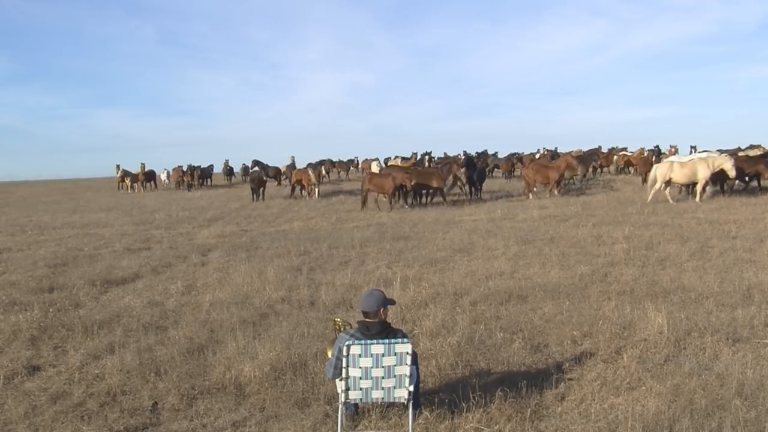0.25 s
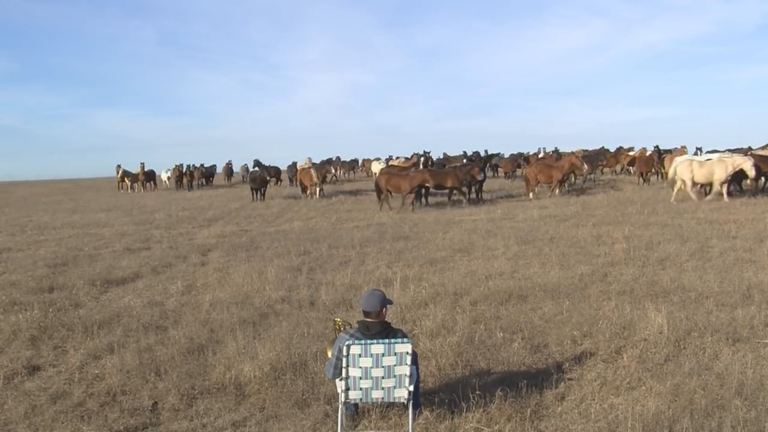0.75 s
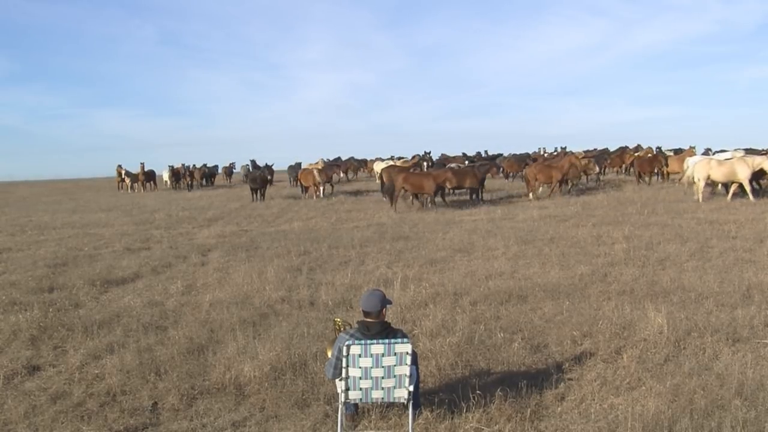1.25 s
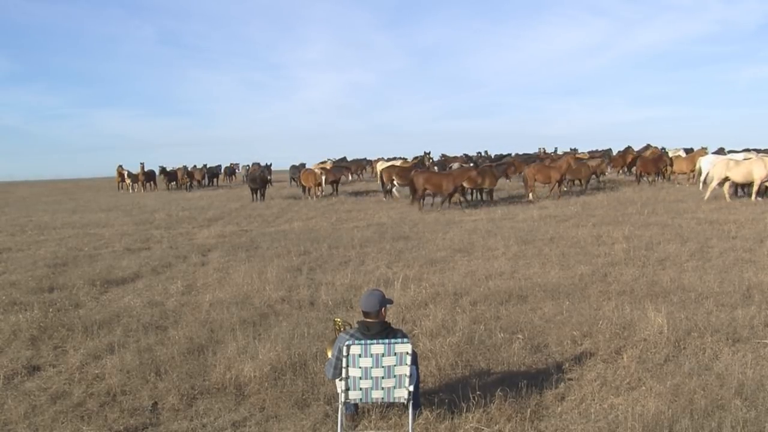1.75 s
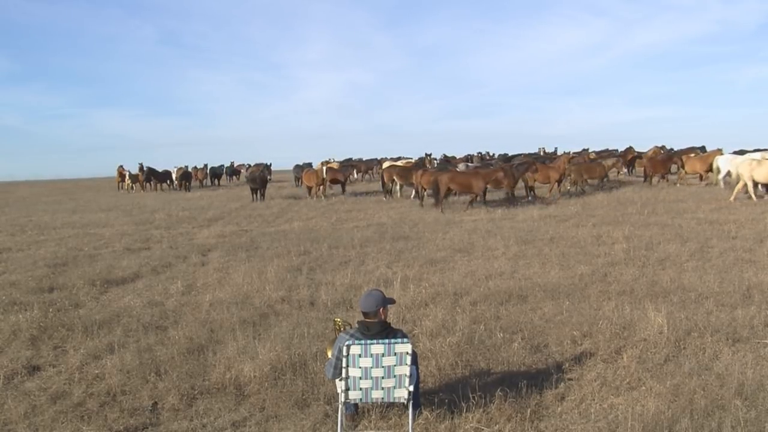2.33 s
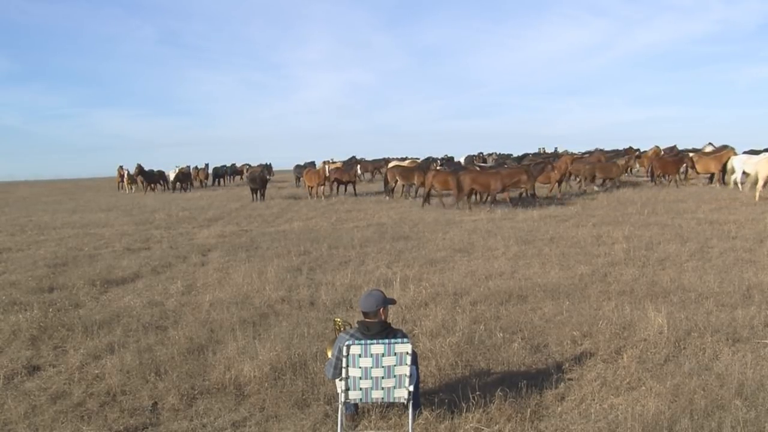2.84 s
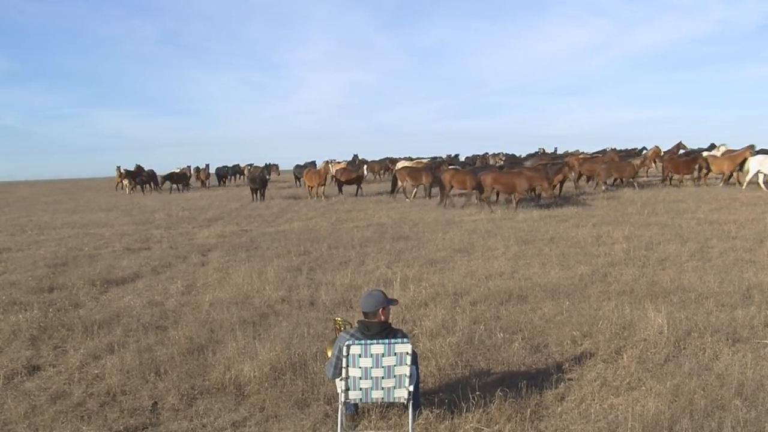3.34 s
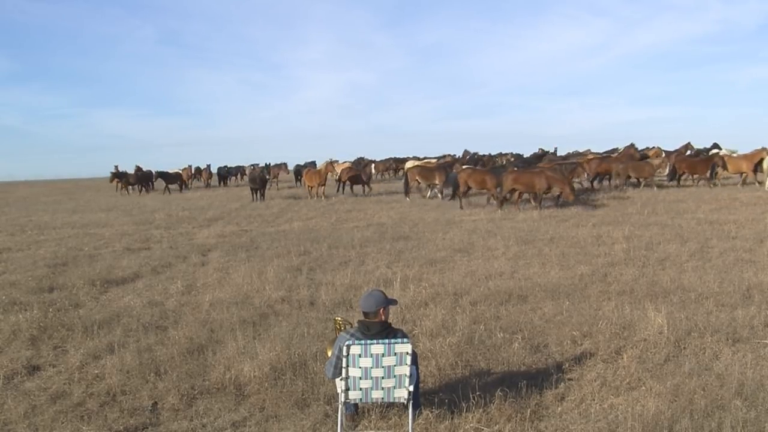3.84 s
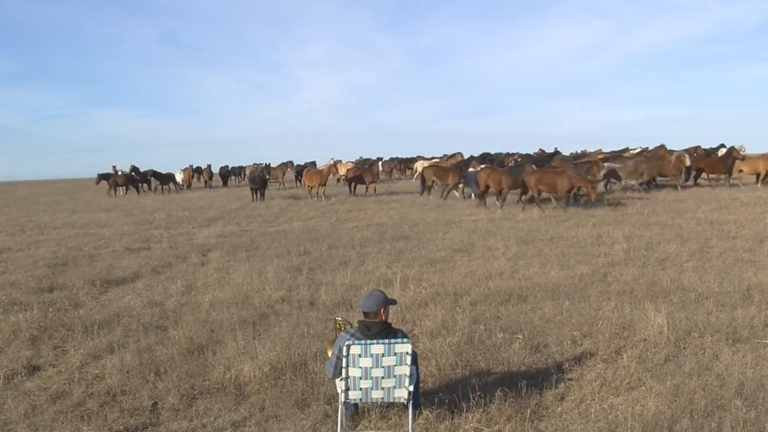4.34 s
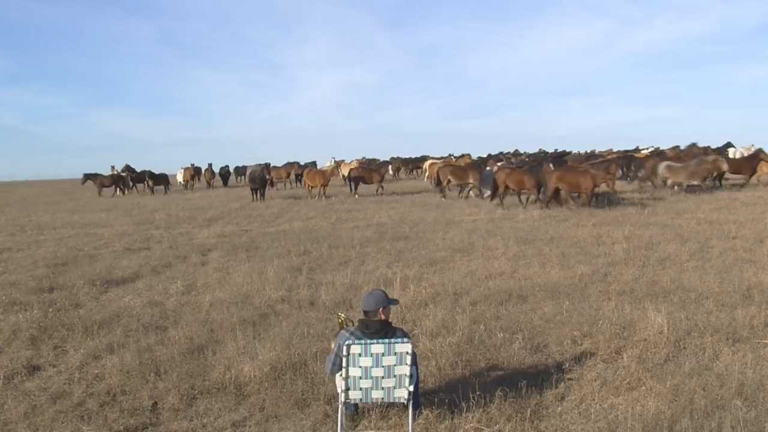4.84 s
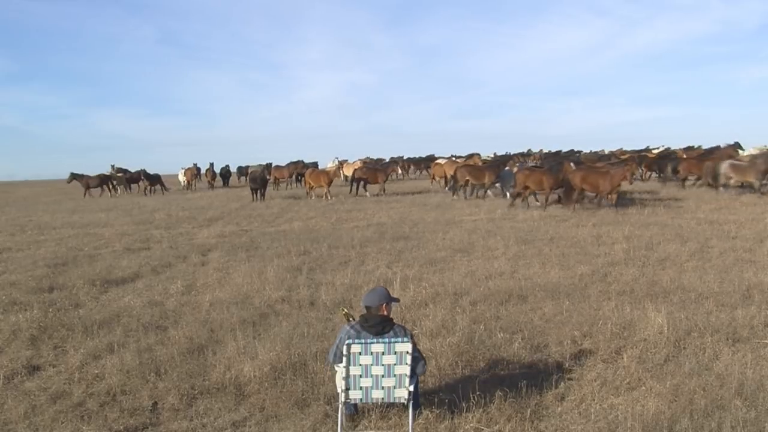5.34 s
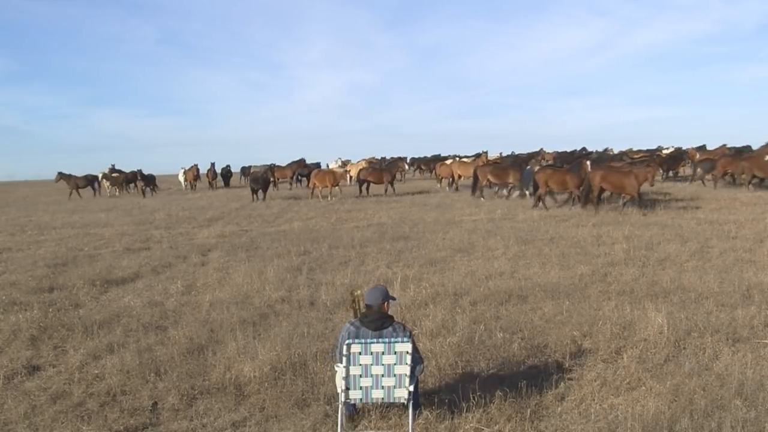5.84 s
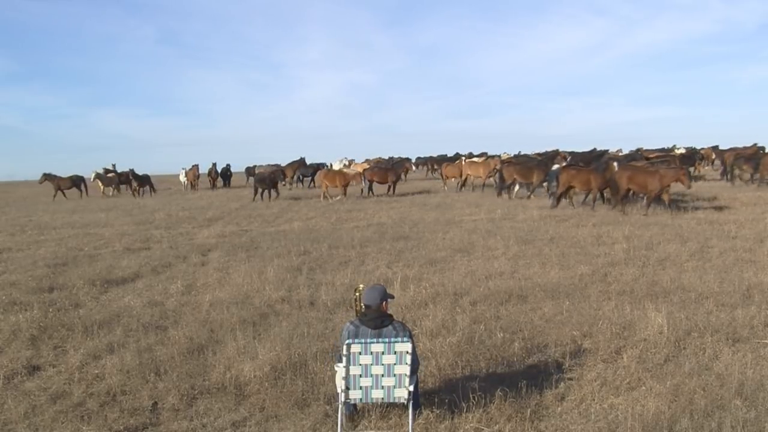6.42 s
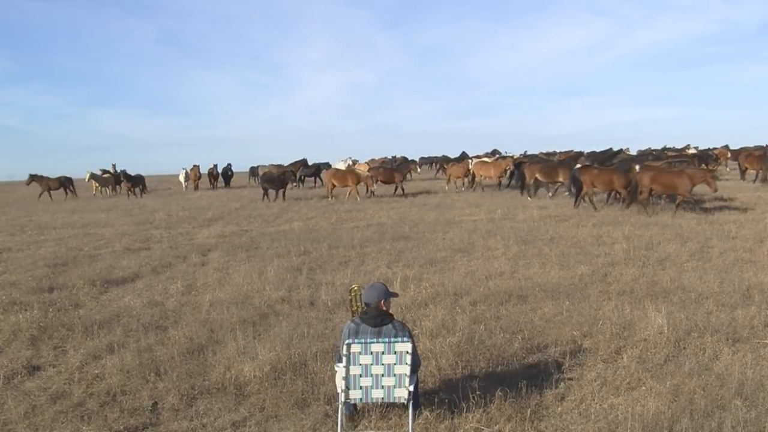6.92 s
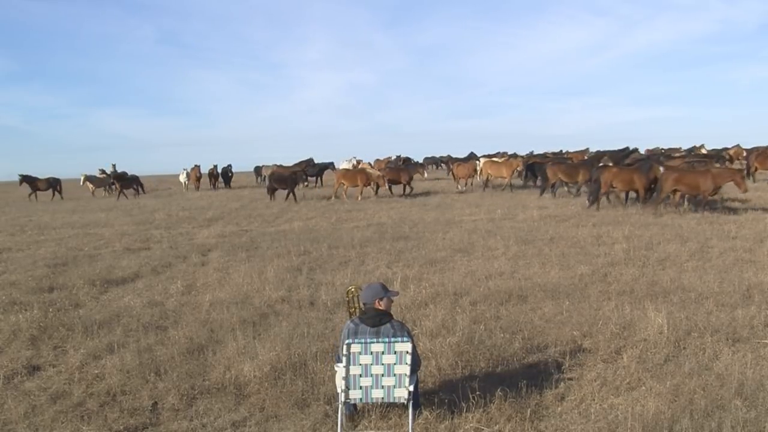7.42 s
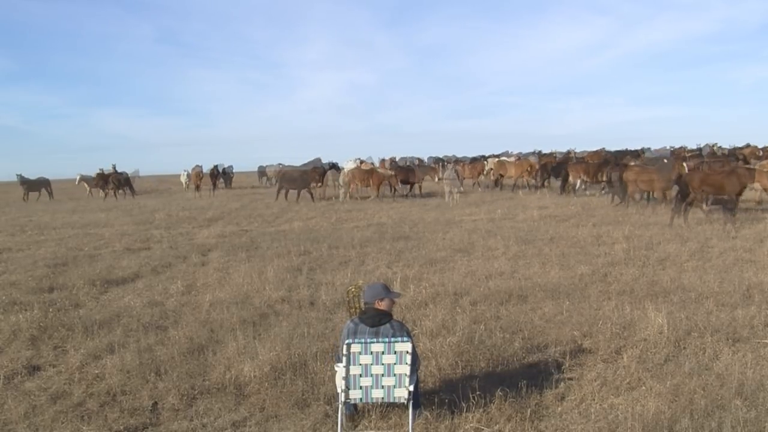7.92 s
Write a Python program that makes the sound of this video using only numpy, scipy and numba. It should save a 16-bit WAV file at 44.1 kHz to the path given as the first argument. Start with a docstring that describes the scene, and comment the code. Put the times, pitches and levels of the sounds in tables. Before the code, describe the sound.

A herd walks quietly through dry grass in a breeze, with thin far whinnies and one loud, fluttering snort close by.

```python
"""Horses in dry grass

A herd walks over an open plain: legs brush the stalks, hooves thud softly, and a breeze buffets the
microphone now and then. Thin, quavering whinnies come from far off, each a high whistle over a lower
voice. A near horse snorts loudly, its nostrils popping, rasping and squealing as they flutter in the
rush of air, and another follows faintly."""
import sys
import numpy as np
from scipy import signal
from scipy.fft import rfft, irfft, next_fast_len
from scipy.io import wavfile
from scipy.ndimage import uniform_filter1d, map_coordinates
from numba import njit

SR = 44100
rng = np.random.default_rng(int(sys.argv[2]) if len(sys.argv) > 2 else 0)


def pcm_store(signal):
    """Save signal as 16-bit PCM."""
    levels = np.round(np.clip(np.atleast_2d(signal), -1, 1) * 32767)
    wavfile.write(sys.argv[1], SR, levels.astype(np.int16).T)


N = 360297
TIME = np.arange(N) / SR


def undb(db):
    """Decibels to gain."""
    return 10 ** (np.asarray(db) / 20)


def unit(x):
    """Scale to rms 1."""
    return x / np.sqrt(np.mean(x ** 2))


def noise():
    """White noise."""
    return rng.standard_normal(N)


def walk(rate_hz):
    """Smooth random modulation, rms 1."""
    t = TIME[::8]
    smooth = map_coordinates(rng.standard_normal(len(t)), [t * rate_hz], order=2, mode="wrap")
    return unit(np.interp(TIME, t, smooth))


def curves(table):
    """An automation curve for each column after the time."""
    times, *columns = np.transpose(table)
    return [np.interp(TIME, times, column) for column in columns]


def during(table):
    """A soft-edged gate, open from a table's first time to its last."""
    return uniform_filter1d(1. * ((TIME > table[0][0]) & (TIME < table[-1][0])), size=300)


def bursts(table):
    """Envelope of rounded swells."""
    return np.sqrt(sum(undb(2 * db) * np.exp(-np.minimum(np.abs(2 * (TIME - s) / length) ** 3, 50))
                       for s, length, db in table))


def colour(x, spectrum):
    """Minimum-phase EQ of unit power: the spectrum sets only the tone."""
    hz, db = np.transpose(spectrum)
    grid = np.maximum(np.fft.rfftfreq(4096, 1 / SR), 1)
    cepstrum = irfft(np.log(undb(np.interp(np.log(grid), np.log(hz), db))))
    half = len(cepstrum) // 2
    response = irfft(np.exp(rfft(np.r_[cepstrum[0], 2 * cepstrum[1:half], np.zeros(half)])))
    return signal.fftconvolve(x, response / np.linalg.norm(response))[:N]


@njit
def resonate(x, hz, q):
    """Band-pass with a moving centre."""
    y, band, low = np.empty(len(x)), 0., 0.
    for i in range(len(x)):
        g = np.tan(np.pi * hz[i] / SR)
        v = (band + g * (x[i] - low)) / (1 + g * (g + 1 / q))
        band, low, y[i] = 2 * v - band, low + 2 * g * v, v / q
    return y


def singing_band(hz, q, steadiness):
    """Air ringing in a resonance: steadiness 0 is ringing noise, 1 an even tone."""
    band = resonate(resonate(noise(), hz, q), hz, q)
    strength = np.sqrt(np.abs(uniform_filter1d(band ** 2, size=90)) + 1e-12)
    return unit(band / strength ** steadiness)


def scatter(x, decay_s):
    """A short diffuse tail, as from grass and bodies."""
    t = TIME[:SR // 2]
    tail = rng.standard_normal(len(t)) * np.exp(-t / decay_s)
    return signal.fftconvolve(x, tail / np.linalg.norm(tail))[:N]


def crunches(steps_per_s=9, attack_s=.0047, decay_s=.023):
    """Envelope of hooves crushing dry grass at random moments."""
    steps = (rng.random(N) < steps_per_s / SR) * undb(3 * np.tanh(noise()))
    t = TIME[:SR // 4]
    return signal.fftconvolve(steps, np.exp(-t / decay_s) * np.minimum(t / attack_s, 1))[:N]


# Tone of brushed grass and of brittle stalks: freq_hz, gain_db
GRASS_EQ = [(30, -63), (90, -46), (160, -35.5), (350, -26.5), (650, -12.5), (1000, -9.5), (1350, -2.5),
            (1700, 2), (2500, -6.5), (4200, -14.5), (6200, -22), (10000, -27.5), (15500, -30)]
STALK_EQ = [(60, -70), (500, -31), (1300, -14.5), (2000, 8.5), (4000, -1.5), (6200, -8.5), (8500, -8.5),
            (15000, -23)]
# Legs sweeping through nearer stalks: centre_s, length_s, level_db
SWISHES = [(.27, 0.074, -71), (2.043, 0.016, -59), (2.11, 0.18, -66.5), (3.1, 0.065, -62.5),
           (3.41, 0.18, -62), (5.35, 0.11, -70), (5.8, 0.13, -63.5), (5.99, 0.11, -65), (6.31, 0.11, -66),
           (7.77, 0.09, -64)]


def grass(level_db):
    """Legs brush and crush dry stalks into a grainy rustle."""
    grains = np.minimum(rng.exponential(size=(2, N)), 5)
    brush = colour(unit(noise() * undb(2.5 * grains[0])), GRASS_EQ) * undb(level_db + .43 * walk(19))
    crunch = colour(unit(noise() * undb(4 * grains[1])), GRASS_EQ) * crunches() * undb(level_db - 2.5)
    crackle = colour(unit(noise() * undb(3.1 * grains[1])), STALK_EQ)
    crackle *= undb(level_db - 13 + 4.8 * np.tanh(walk(9))) + bursts(SWISHES)
    return brush + crunch + crackle


# Nearer hoof falls: start_s, level_db
HOOF_FALLS = [(2.766, -59), (2.87, -76), (6.096, -64), (6.453, -67), (6.84, -70), (6.908, -62.5),
              (7.161, -69), (7.32, -69)]
# Dull tone of turf: freq_hz, gain_db
THUD_EQ = [(30, -48), (90, -13.5), (160, 6), (350, 2.5), (700, -6.5), (1500, -12), (5000, -30)]


def hooves(swell_db, tread_db=-82, decay_s=.014):
    """Single hooves land on turf over the soft tread of the herd."""
    falls = sum(undb(db) * (TIME > s) * np.exp(-np.abs(TIME - s) / decay_s) for s, db in HOOF_FALLS)
    tread = undb(tread_db + swell_db + 7.8 * np.tanh(walk(12)))
    return colour(noise() * (falls + tread), THUD_EQ)


def herd(rustle_db=-56.5, pass_db=3.5, pass_at_s=4.97, pass_width_s=1.56):
    """Rustle and tread swell as the nearest horses go by."""
    swell_db = pass_db * np.exp(-((TIME - pass_at_s) / pass_width_s) ** 2) - .17 * walk(1.38)
    return grass(rustle_db + swell_db) + hooves(swell_db)


# Breaths of wind, and the hardest eddies in them: centre_s, length_s, level_db
GUSTS = [(0, 0.15, -58.5), (.36, 0.44, -63), (.75, 0.31, -52.5), (1.12, 0.36, -58), (1.47, 0.076, -58),
         (1.9, 0.37, -64.5), (2.23, 0.076, -65.5), (2.3, 0.98, -80.5), (2.62, 0.14, -59.5),
         (2.9, 0.16, -69), (7.85, 0.35, -64.5)]
EDDIES = [(0.216, 0.014, -54.5), (0.694, 0.0052, -43.5), (.708, 0.01, -41), (.776, 0.013, -44.5),
          (0.844, 0.0091, -47), (0.953, 0.043, -52), (1.014, 0.0029, -42), (1.023, 0.016, -51),
          (1.041, 0.0039, -43.5), (1.101, 0.016, -41), (1.126, 0.03, -46), (1.282, 0.021, -51.5),
          (1.781, 0.052, -47), (1.919, 0.01, -52), (2.005, 0.0049, -42.5), (2.022, 0.019, -43.5),
          (2.236, 0.015, -51.5), (2.364, 0.014, -65), (2.546, 0.013, -48.5), (2.604, 0.059, -52.5),
          (2.67, 0.036, -50), (7.878, 0.085, -48.5), (8.01, 0.042, -43.5), (8.053, 0.049, -43)]
# Tone of the four wind layers: freq_hz, gain_db
BREEZE_EQ = [(25, -20), (65, -10), (130, 2), (200, 9.5), (350, -2), (750, -1.5), (1100, -4.5), (3000, -45)]
BUFFET_EQ = [(25, -38), (60, -53), (110, -16), (180, -3.5), (300, 8), (520, 5), (780, 5), (1000, -16),
             (1400, -10), (4000, -69)]
WHOOSH_EQ = [(60, -57), (250, -32.5), (450, -4.5), (750, -5.5), (900, -15), (1100, -22), (3000, -52.5)]
JOLT_EQ = [(40, -51), (130, -25), (280, 5), (520, 2), (780, -3), (1050, -14), (3000, -53)]


def wind(strong_db=-42, calm_db=-88):
    """Turbulence at the microphone: low flutter and ragged buffets, brighter the harder they hit."""
    gusts = bursts(GUSTS)
    flutter = colour(unit(noise() * undb(2 * walk(45))) * (gusts + undb(calm_db)), BREEZE_EQ)
    small_eddies = gusts * undb(-4) * unit(undb(5 * np.tanh(walk(40))))
    strength = np.hypot(bursts(EDDIES), small_eddies) / undb(strong_db) * unit(undb(3 * walk(250)))
    buffet = colour(noise() * strength ** .95, BUFFET_EQ)
    whoosh = colour(noise() * strength ** 1.6, WHOOSH_EQ) * undb(-1.5)
    # the core of each hard eddy lands as one dull pressure pulse
    pulses = sum(undb(db) * (np.arange(N) == int((s - .0015) * SR)) for s, _, db in EDDIES)
    jolts = undb(16.5) * colour(pulses, JOLT_EQ)
    return flutter + undb(strong_db) * (buffet + whoosh) + jolts


def whinny(course, crest_s, voice_db, quaver_hz=8.25, quaver_depth=.063, voice_ratio=.33):
    """A quavering whistle rides over the vocal folds' lower voice; they couple in hoarse sidebands."""
    crest_hz, level_db, dip_db, octave_db, hoarse_db = curves(course)
    dip = (1 - np.cos(2 * np.pi * quaver_hz * (TIME - crest_s))) / 2
    pitch = crest_hz * (1 - quaver_depth * dip ** 1.3 + .004 * walk(45))  # lingers on each crest
    high = 2 * np.pi * np.cumsum(pitch * (1 + .00786 * walk(220))) / SR
    low = 2 * np.pi * np.cumsum(pitch * voice_ratio * (1 - .13 * dip) * (1 + .027 * walk(200))) / SR
    octave = undb(octave_db + 2 * walk(150)) * np.sin(2 * high + .47 * walk(450))
    voice = np.sin(low) + 1.1 * np.sin(2 * low) + np.sin(3 * low + .79 * walk(200))
    voice *= undb(voice_db - dip_db * dip / 3)
    sidebands = np.sin(high + low + .38 * walk(400))
    sidebands += .2 * np.sin(high - low) + .18 * np.sin(2 * high - low)
    hoarse = undb(hoarse_db) * (sidebands + undb(-5) * colour(noise(), GRASS_EQ))
    envelope = np.sqrt(2) * undb(level_db - dip_db * dip + 1.5 * np.tanh(walk(130)))
    return ((np.sin(high) + octave + hoarse) * envelope + voice) * during(course)


# Contours of the far calls: time_s, crest_pitch_hz, level_db, quaver_dip_db, octave_db, hoarse_db
FAINT_WHINNY = [(.2, 1485, -62, 7, -20, -18), (.28, 1424, -64, 0, -20, -18), (.43, 1223, -66, 3, -20, -16)]
THIN_WHINNY = [(1.11, 1844, -51, 5, -30, -20), (1.15, 1868, -49, 5, -35, -24),
               (1.27, 1910, -56.5, 2.7, -32, -22), (1.35, 1910, -48, 10, -30, -22),
               (1.39, 1908, -43.5, 29, -35, -23), (1.51, 1893, -44, 16, -37, -22),
               (1.635, 1840, -49.5, 18, -33, -20), (1.7, 1830, -60, 20, -30, -20)]
HOARSE_WHINNY = [(3.12, 1273, -66, 8, -22, -15), (3.175, 1303, -56.5, 19, -26, -22),
                 (3.24, 1430, -60, 6, -20, -7), (3.3, 1598, -48, 4.8, -15, -7.5),
                 (3.41, 1720, -52.5, 4, -3.5, -2), (3.47, 1734, -49.5, 5.5, -11, -1),
                 (3.53, 1740, -47, 7.4, -11, -16), (3.655, 1765, -46, 11.3, -11.5, -13.5),
                 (3.78, 1735, -49.5, 13.5, -12.5, -17), (3.9, 1700, -52, 18, -19, -22),
                 (4.03, 1330, -65, 12, -24, -10)]


def whinnies():
    """Three calls from far across the plain."""
    return (whinny(FAINT_WHINNY, crest_s=.26, voice_db=-79)
            + whinny(THIN_WHINNY, crest_s=1.39, voice_db=-82)
            + whinny(HOARSE_WHINNY, crest_s=3.534, voice_db=-72))


# Brief far squeaks: centre_s, length_s, pitch_hz, glide_hz_per_s, level_db
SQUEAKS = [(0.958, 0.028, 1520, 2500, -53), (1.067, 0.034, 1553, 708, -47),
           (1.74, 0.0347, 1560, 1800, -56.5), (7.284, 0.0296, 1494, 491, -54)]


def squeaks():
    """The whinny's whistle alone, in short rising notes."""
    out = np.zeros(N)
    for s, length, hz, glide, db in SQUEAKS:
        pitch = (hz + glide * np.clip(TIME - s, -length, length)) * (1 + .0063 * walk(200))
        out += np.sin(2 * np.pi * np.cumsum(pitch) / SR) * bursts([(s, length, db)])
    return out


# Dry ticks: centre_s, length_s, level_db
TICKS = [(2.77, 0.0032, -43), (4.165, 0.0055, -37.5), (5.187, 0.00075, -36.5), (5.717, 0.0028, -52)]
# Their sharp tone: freq_hz, gain_db
TICK_EQ = [(50, -27), (250, -29), (900, -1), (1900, 13), (2500, 2), (5000, -21), (15000, -52)]


def ticks():
    """Tiny dry snaps of noise, from the herd and from the near horse's nostrils as its flutter starts."""
    return colour(noise() * bursts(TICKS), TICK_EQ)


def flaps(rates, opens_s):
    """Nostril flutter: flap number, phase from 0 to 1, and rough seconds since opening."""
    rate, = curves(rates)
    turns = np.cumsum(rate) / SR
    turns -= np.interp(opens_s, TIME, turns)
    phase = turns % 1
    return (np.floor(turns) - np.floor(turns[0])).astype(int), phase, phase / rate


# One flap of the nostrils: cycle_share, flow_db, resonance_hz, hiss_db
FLAP_SHAPE = [(0, -15.5, 806, -1.5), (.17, -3, 860, -11), (.4, -2, 1165, 0), (.6, 3.5, 1520, -3),
              (.72, 1, 1710, -12), (.8, -5.5, 1750, -6), (.94, -11, 1370, -25), (1, -19, 900, 0)]
# Tone of the rushing breath and its hiss: freq_hz, gain_db
BREATH_EQ = [(40, -64), (90, -60), (150, -28), (270, -27.5), (520, -26.5), (750, -10.5), (1100, -3),
             (1600, 3.5), (2000, -3), (2500, -9.5), (4100, -20.5), (5000, -23), (6500, -34), (15500, -53.5)]
HISS_EQ = [(500, -40), (2000, -6), (3000, 5.5), (4500, 4), (6300, -11), (8500, -11), (11000, -41),
           (15500, -40)]


def nostril_air(phase, swing, tension, detune, nasal_db, nose_db, rest_hz=1290):
    """Rasping breath: one resonance sweeps with the gap, one follows tension, the nose rings on."""
    share, *columns = np.transpose(FLAP_SHAPE)
    flow_db, gap_hz, jet_db = (np.interp(phase, share, column) for column in columns)
    rush = colour(unit(noise() * undb(2.5 * walk(400))), BREATH_EQ)
    sweep_hz = rest_hz * (gap_hz / rest_hz) ** swing
    wander = np.exp(.065 * detune + .041 * walk(180))
    nasal = singing_band(sweep_hz * tension ** .28 * wander, q=3.7, steadiness=.55)
    nasal *= undb(nasal_db + 7 * np.log2(sweep_hz / 1500))
    upper = undb(-12 + jet_db * swing / 2) * singing_band(3900 * tension ** 2, 6.3, .16) / tension
    nose = undb(nose_db) * tension ** 2 * singing_band(1620 * np.exp(.025 * walk(60)), 5.3, .55)
    hiss = colour(unit(noise() * undb(4.8 * walk(500))), HISS_EQ)
    hiss *= undb(-8.5 + jet_db * swing) * tension ** 3
    chop = undb(flow_db * swing * np.sqrt(np.minimum(tension, 1)))  # shallower when slack
    wet_rasp = unit(undb(1.5 * np.tanh(walk(450))))
    return ((rush + nasal) * chop + nose + upper + hiss) * wet_rasp


def nostril_squeal(phase, tension, detune, base_hz=1860, peak_phase=.68):
    """The narrowing slit gives a ragged whistle just before it shuts."""
    closing = phase - peak_phase
    pitch = base_hz * np.sqrt(tension) * np.exp(.85 * closing + .05 * detune + .05 * walk(600))
    width = np.where(closing < 0, .08, .038)  # swells, then cuts off faster
    envelope = np.exp(-(closing / width) ** 2) * undb(3 * np.tanh(walk(550)))
    return np.sin(2 * np.pi * np.cumsum(pitch) / SR) * envelope


def snort(rates, effort, swings, slap_eq, opens_s, slap_db, pop_s, hollow_db, nasal_db, nose_db,
          squeal_gain=0):
    """Forced breath flaps the nostrils: each cycle pops open, passes air and may squeal shut."""
    flap, phase, age_s = flaps(rates, opens_s)
    air_db, tension = curves(effort)
    swing, smack_db = curves(swings)
    squeal_detune, nasal_detune = rng.standard_normal((flap[-1] + 1, 2))[flap].T
    air = nostril_air(phase, swing, tension, nasal_detune, nasal_db, nose_db) * undb(air_db)
    squeal = nostril_squeal(phase, tension, squeal_detune) * squeal_gain
    # each opening is a fleshy pop with a wet spatter
    pop = np.diff(flap, prepend=0)
    spatter = 1.5 * noise() * np.exp(-age_s / pop_s) * np.sqrt(2 / (pop_s * SR))
    smack = undb(air_db + smack_db)
    slap = colour((pop + spatter) * tension ** 2 * smack * undb(slap_db), slap_eq)
    # the slacker the nostrils, the more the nose rings hollow after the pop
    hollow_hz = np.full(N, 740.)
    hollow = resonate(singing_band(hollow_hz, 3.1, .41) * np.exp(-age_s / .0046), hollow_hz, 3.)
    hollow *= smack * undb(hollow_db) / tension ** 4
    return (air + squeal + slap + hollow) * during(effort)


# Flutter speed, sagging as the air runs out: time_s, rate_hz
NEAR_FLAPS = [(4.15, 31), (4.32, 31), (4.35, 27), (4.44, 27.6), (4.52, 26.2), (4.6, 25.9), (4.8, 21.9),
              (4.95, 19.6), (5.15, 13)]
FAR_FLAPS = [(5.27, 35), (5.39, 32.5), (5.44, 39.5), (5.6, 39), (5.67, 30.3), (5.76, 30), (5.81, 26.5),
             (6.0, 26)]
# Push of the breath and tightness of the nostrils: time_s, air_db, tension_ratio
NEAR_EFFORT = [(4.03, -55.5, 1.04), (4.189, -55, 1.22), (4.2, -33.5, 0.84), (4.361, -34, 0.85),
               (4.579, -36, 1.075), (4.718, -36, 0.82), (4.868, -40, .8), (4.98, -41.5, 0.67),
               (5.059, -52, 0.69), (5.151, -73, 1.1)]
FAR_EFFORT = [(5.27, -52.5, 0.89), (5.42, -57.5, 1), (5.6, -56, 0.76), (5.68, -73, 0.54),
              (5.73, -56.5, 0.79), (5.86, -59, 0.83), (5.91, -72, 1), (5.98, -61.5, 0.69),
              (6.22, -82, 0.64)]
# How fully the nostrils swing and slap: time_s, swing_share, smack_db
NEAR_SWING = [(4.17, .2, -18), (4.21, .55, -16), (4.31, .8, -12), (4.345, 1, -2), (4.52, 1, -4),
              (4.57, 1, 0), (4.6, 1, -3), (4.73, 1, -1), (4.86, 1, 3.5), (5.06, 1, 2)]
FAR_SWING = [(5.33, 0.65, -9), (5.38, 0.94, 0.5)]
# Tone of the fleshy slap: freq_hz, gain_db
NEAR_SLAP_EQ = [(40, -65), (150, -28), (300, -22), (550, -9), (760, -12), (1050, -10), (1750, 16.5),
                (2500, 0), (4100, 0.5), (5500, -19), (8500, -21.5), (11000, -39), (15500, -36)]
FAR_SLAP_EQ = [(50, -50), (150, -33), (450, -20), (700, 2.5), (1050, -3), (1700, 6.5), (3000, -17),
               (8000, -36), (15500, -48)]
# The near squeal, shrieking in under high pressure and catching again: time_s, level_db
SQUEAL_LEVEL = [(4.28, -40), (4.3, -11.5), (4.335, -19), (4.41, -19), (4.48, -16.5), (4.52, -19),
                (4.555, -31), (4.596, -15.5), (4.635, -24), (4.675, -29), (4.715, -23), (4.76, -36),
                (4.8, -48)]


def snorts():
    """A near horse blows hard enough to squeal; a farther one answers with a soft flutter."""
    squeal_db, = curves(SQUEAL_LEVEL)
    near = snort(NEAR_FLAPS, NEAR_EFFORT, NEAR_SWING, NEAR_SLAP_EQ, opens_s=4.5695, slap_db=23,
                 pop_s=.0011, hollow_db=-10.5, nasal_db=0, nose_db=-6, squeal_gain=undb(squeal_db))
    far = snort(FAR_FLAPS, FAR_EFFORT, FAR_SWING, FAR_SLAP_EQ, opens_s=5.716, slap_db=26,
                pop_s=.0054, hollow_db=-1, nasal_db=-17, nose_db=-10)
    return near + far


# A puff of breath: centre_s, length_s, level_db
HUFFS = [(6.68, 0.076, -50.5)]
# Its nasal tone: freq_hz, gain_db
HUFF_EQ = [(40, -49), (300, -20), (800, -10), (1100, 6.5), (1400, 3), (1750, 6.5), (2600, -3), (5000, -18),
           (12000, -36)]


def huff():
    """One short blow through the nose."""
    return colour(noise() * bursts(HUFFS), HUFF_EQ)


def scene():
    """Horses, grass and wind reach two closely spaced microphones almost alike."""
    calls = whinnies() + squeaks()
    calls += undb(-14) * scatter(calls, decay_s=.025)
    horses = calls + huff() + ticks() + snorts()
    mid = horses + undb(-22) * scatter(horses, decay_s=.05) + herd() + wind()
    # a small, flickering phase difference gives a little width
    side = undb(-18) * np.imag(signal.hilbert(mid, next_fast_len(N)))[:N] * walk(60)
    return np.array([mid + side, mid - side])


# Ringing of the microphone ports: centre_hz, width_hz, boost_db
PORT_PEAKS = [(8360, 1200, 4.5), (12400, 1100, 3.5)]


def record(dry):
    """The microphone ports ring in the treble; the top is cut at 15.7 kHz."""
    out = dry
    for hz, width, db in PORT_PEAKS:
        out = out + (undb(db) - 1) * signal.lfilter(*signal.iirpeak(hz, hz / width, fs=SR), out)
    return signal.sosfilt(signal.ellip(10, .2, 70, 15700, fs=SR, output="sos"), out)


dry = scene()
out = record(dry)
pcm_store(out)
```